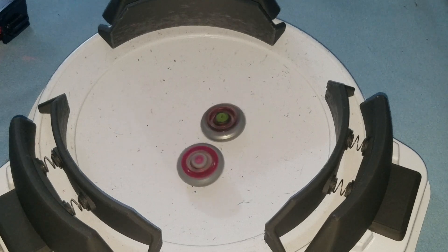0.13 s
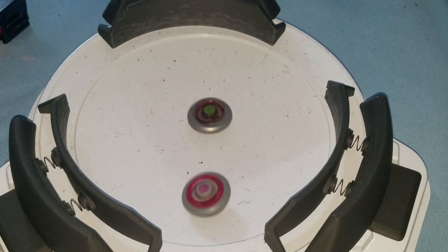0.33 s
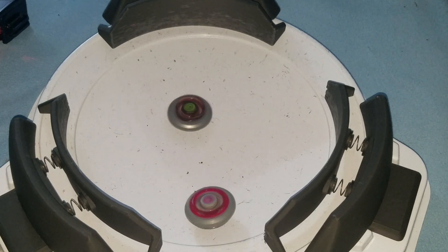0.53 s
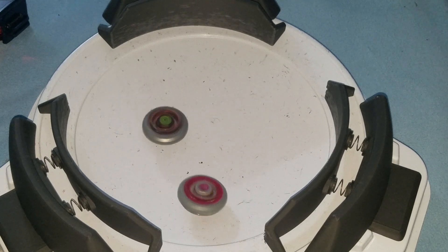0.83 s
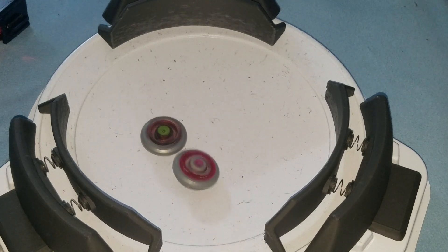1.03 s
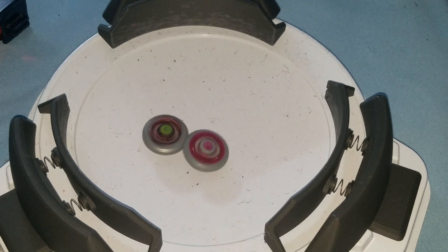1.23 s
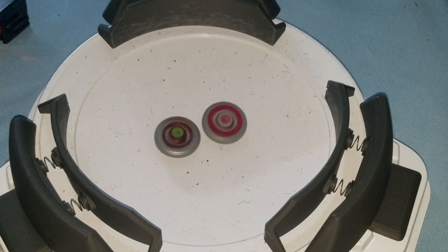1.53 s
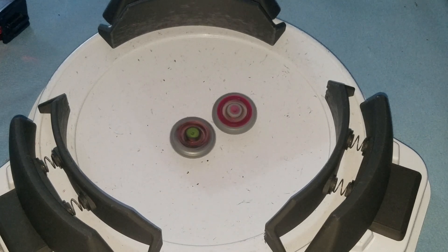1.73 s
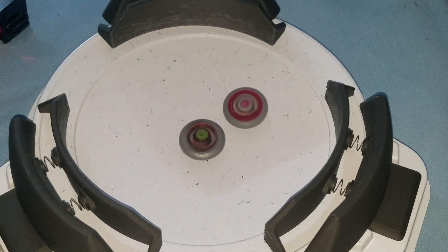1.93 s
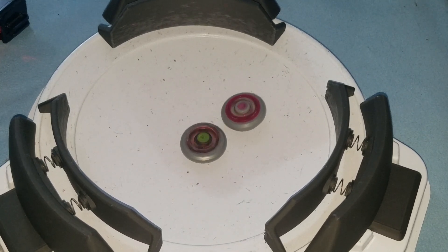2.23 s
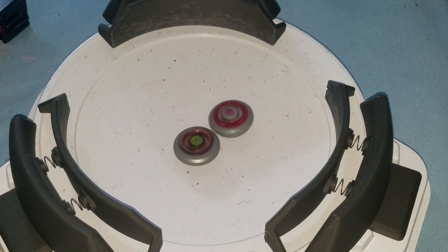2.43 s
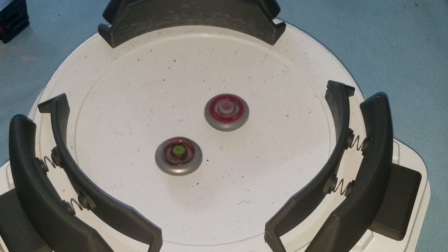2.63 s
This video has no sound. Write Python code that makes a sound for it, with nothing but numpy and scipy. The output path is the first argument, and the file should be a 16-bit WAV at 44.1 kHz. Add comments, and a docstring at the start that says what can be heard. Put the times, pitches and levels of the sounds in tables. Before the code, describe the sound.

Two spinning tops with metal wheels collide several times in a plastic dish, each hit a sharp, briefly ringing clink. Between hits their tips whir softly and tick. Heard close in a small room with a faint hum.

```python
"""A plastic dish in a small room: two spinning tops with metal wheels circle and clash. Each clash rings
both wheels, whose modes the spin splits into close pairs, and sends the tops skidding. The tips whir on
the dish; one ticks about once a turn, the other clicks for a while. A top knocks the wall twice.
The room answers; a faint hum lies underneath."""
import sys
import numpy as np
from scipy import signal
from scipy.fft import rfft, irfft, next_fast_len
from scipy.io import wavfile
from scipy.ndimage import uniform_filter1d, map_coordinates

SR = 44100
rng = np.random.default_rng(int(sys.argv[2]) if len(sys.argv) > 2 else 0)


def persist_wave(psi):
    """Save psi, clipped to +-1, as 16-bit WAV."""
    counts = np.round(np.clip(psi, -1, 1) * 32767).astype(np.int16)
    wavfile.write(sys.argv[1], SR, np.atleast_2d(counts).T)


N = 123479

# room noise spectrum: f/Hz, level/dB
AIR_SPECTRUM = [(25, -56), (60, -5), (200, -18.5), (500, -9.5), (1700, -17), (3000, -22.5), (6000, -82),
                (9500, -36), (12000, -28), (15800, -17.5)]
# tip rub envelope: t/s, low/dB, mid/dB, treble/dB
WHIR_LEVELS = [(0.0, -47.5, -55.5, -110), (0.26, -54, -53.5, -54), (0.4, -49.5, -53, -52.5),
               (0.65, -50, -49, -58.5), (0.9, -54.5, -55, -55.5), (1.071, -43, -41, -57),
               (1.149, -46.5, -49, -79), (1.32, -50.5, -51.5, -67), (1.46, -48.5, -52, -61.5),
               (1.59, -51, -52.5, -69.5), (1.96, -65, -62, -67.5), (2.129, -74, -76, -72),
               (2.33, -53, -60, -63.5), (2.4, -68.5, -71, -85.5), (2.46, -50, -41, -31),
               (2.55, -56.5, -59, -57.5), (2.63, -60, -74.5, -60.5), (2.8, -76.5, -80, -76)]
# low dish resonances: f/Hz, width/Hz, level/dB
DISH_LOW_MODES = [(184, 16, 2), (256.7, 28.2, 2.5), (319, 58.5, 0), (404, 119, -6.5)]
# upper dish resonances: f/Hz, width/Hz, level/dB
DISH_HIGH_MODES = [(1122, 330, -0.5), (1447, 97, 5), (1592.5, 36.5, 9), (2469, 82, 1.5), (3385, 302, -6.5),
                   (4760, 56, -16.5), (8050, 100, -14.5), (13500, 5000, -35.5)]
# tip hiss spectrum: f/Hz, level/dB
HISS_SPECTRUM = [(3000, -5.5), (4500, 0), (8000, 5), (9500, -17.5), (12000, 2), (15800, 3.5)]
# taps of one tip: t/s, level/dB, low share/dB, bright share/dB
TICKS = [(0.0318, -36, -9, -13), (0.0687, -37.5, -6.5, -12.5), (0.1082, -38.5, -9, -13.5),
         (0.1471, -45.5, -3, -31), (0.3466, -35.5, -7, -19), (0.3706, -35, -20, -15),
         (0.3865, -38.5, -26, -25), (0.4125, -43.5, -10, -14), (0.4544, -37, -6.5, -15),
         (0.4933, -40, -8, -20), (0.5192, -41, -5, -13), (0.5916, -33.5, -3.5, -15.5),
         (0.635, -35, -20, -16), (0.6749, -38, -8, -9), (0.7163, -34.5, -19.5, -2), (0.7572, -36, -15.5, 3),
         (0.7976, -34, -6.5, -0.5), (0.8395, -37, -14, -25), (0.8799, -35.5, -7, -8), (0.9213, -34, -5, -5),
         (0.9457, -43, 3.5, -5.5), (0.9652, -37, -1, -6.5), (1.1313, -38, 2.5, -2),
         (1.297, -36.5, -4, -16.5), (1.3359, -35.5, -12, -9.5), (1.3773, -36.5, -8.5, -11),
         (1.4182, -40, -3.5, -6.5), (1.504, -42, -2, -16), (1.5469, -40, -1, -10.5),
         (1.5908, -36.5, -8.5, -13), (1.6322, -39, -11.5, -8), (1.7015, -52, 5, -8),
         (1.7439, -42.5, -8, -11.5), (1.934, -41, -3, -22), (1.9784, -37.5, -10, -14.5),
         (2.0208, -38, -10, -9), (2.0657, -37, -4.5, -20.5), (2.1096, -45.5, -11.5, -16),
         (2.153, -37.5, -11.5, -17.5), (2.1949, -41, -3, -14.5), (2.2398, -44, -3.5, -20),
         (2.3316, -37, -6, -18), (2.3745, -41, -12, -20.5), (2.6908, -52.5, -1, -12),
         (2.7287, -52, -2, -13), (2.7726, -46.5, -3.5, -17), (1.8043, -45.5, -1, -23.5)]
# wheel on wheel: t/s, low ring/dB, high ring/dB, contact modes/dB, wash/dB, crack/dB, thud/dB,
# knock/dB, skid/dB, noise tilt/(dB/octave), T60/ratio, waver/ratio, detune/cents
CLASHES = [(0.2193, -15.5, -12, -6, -20, -25, -28.5, -30.5, -36, 0.5, 0.73, 1.3, -1),
           (1.0225, -24.5, -16, 3, -27, -12.5, -25.5, -52, -40, -0.5, 0.82, 1.34, -8.5),
           (1.1784, -36, -52, -9, -39, -50, -34, -31, -62.5, -4, 0.39, 1.46, -6),
           (1.1893, -43, -33, -8.5, -29, -8.5, -23.5, -34.5, -49.5, -0.5, 1.27, 0.82, -7),
           (1.8286, -17, -17, 0.5, -26.5, -15.5, -30, -28.5, -65.5, -0.5, 0.93, .45, 1),
           (2.2982, -29, -31, 5, -37, -24.5, -41.5, -34, -58.5, -2.5, 0.78, 0.52, -2),
           (2.4198, -20, -26.5, 16.5, -23, -12, -32.5, -40.5, -31.5, -0.5, 0.94, 0.99, 0.5)]
# wheel modes, a common set and a set whose share depends on the contact point:
# f/Hz, level/dB, T60/s, left minus right/dB
WHEEL_MODES = [
    [(5531, -15, .4, -4), (5625, -13.5, .38, -4), (5981, -2, .37, -1), (6029, -2, .19, -1),
     (6075, -3, .33, -1), (6416, -20, .24, -2), (7990, -20, .19, -5), (12000, -17, .2, 2),
     (13558, -11, .26, 0), (13615, -5, .21, 0), (13758, -5, .25, 0)],
    [(4786, -28, .22, 0), (11120, -14, .18, 2), (12350, -19, .19, 1), (12775, -13, .14, 1),
     (12830, -12, .21, 1), (12877, -11, .19, 1), (13437, -3, .2, 0), (14150, -16, .14, 0),
     (15150, -14, .14, 0)],
]
# crack and wash spectrum: f/Hz, level/dB
CRACK_SPECTRUM = [(60, -68), (300, -7), (1500, -8.5), (3000, -2.5), (4400, -10), (5200, -6.5), (6500, -2),
                  (8300, 2), (9000, -21.5), (9800, -12), (10600, 0), (13000, 2), (15700, -2.5)]
# clicks of the other tip: t/s, level/dB
CLICKS = [(0.4788, -29), (0.521, -27), (0.5606, -28), (0.602, -34), (0.6328, -37), (0.6742, -48),
          (0.756, -47), (0.7979, -48), (0.8887, -37), (0.9286, -44.5), (0.967, -48.5)]
# top on dish wall: t/s, level/dB
WALL_KNOCKS = [(1.1891, -24), (1.2215, -34)]
# dish wall resonances: f/Hz, width/Hz, level/dB
WALL_MODES = [(1090, 50, 0), (2230, 92, -8)]
# microphone likeness: f/Hz, left-right correlation (clipped to +-1 in use)
MIC_LIKENESS = [(30, -13.5), (100, 4), (300, 0.98), (700, 0.67), (2500, 0.57), (7000, 0.06), (14000, -0.4)]
# microphone balance: f/Hz, left minus right/dB
MIC_BALANCE = [(40, 10), (190, 1.5), (400, 0.5), (1500, -1), (6000, -3), (12000, 1)]
# microphone phase: f/Hz, left lag/rad
MIC_LAG = [(60, 0.82), (190, 0.68), (300, 0.24), (700, 0)]


def amp(db):
    """dB to gain."""
    return 10 ** (np.asarray(db) / 20)


def decay(t, t60_s):
    """Exponential fall, 60 dB in t60_s."""
    return amp(-60 * t / t60_s)


def unit(x):
    """Scale to rms 1."""
    return x / np.sqrt(np.mean(x ** 2) + 1e-20)


def along(points, hz):
    """Interpolate (f/Hz, value) points on a log axis."""
    f, v = np.transpose(points)
    return np.interp(np.log(hz + 1), np.log(f + 1), v)


def wobble(rate_hz, size):
    """Smooth random curve, rate_hz knots a second."""
    knots = rng.standard_normal(int(size * rate_hz / SR) + 4)
    return map_coordinates(knots, [np.arange(size) * rate_hz / SR])


def filtered(x, response):
    """Apply a complex frequency response."""
    n = x.shape[-1]
    m = next_fast_len(n + SR // 8)
    return irfft(rfft(x, m) * response(np.fft.rfftfreq(m, 1 / SR)), m)[..., :n]


def noise(size, response):
    """Two independent filtered noises."""
    return filtered(rng.standard_normal((2, size)), response)


def spectrum(points):
    """Response through (f/Hz, level/dB) points."""
    return lambda hz: amp(along(points, hz))


def body(modes, scatter_db=0):
    """Response of parallel resonances, alternating in sign."""
    gains = amp(scatter_db * rng.standard_normal(len(modes)))
    return lambda f: sum(
        (-1) ** k * gains[k] * amp(db) * 1j * f * width / (hz * hz - f * f + 1j * f * width)
        for k, (hz, width, db) in enumerate(modes))


def stereo(sources):
    """Mix two independent signals to left and right with the microphones' likeness."""
    def weights(hz):
        angle = np.arccos(np.clip(along(MIC_LIKENESS, hz), -1, 1)) / 2
        return np.array([np.cos(angle), np.sin(angle)])
    mid, side = filtered(sources, weights)
    return np.array([mid + side, mid - side])


def add(track, at_s, sound):
    """Mix a sound in at at_s."""
    k = round(at_s * SR)
    track[:, k:k + sound.shape[-1]] += sound[:, :N - k]


def room(x, t60_s=.22, delay_s=.004):
    """Reverberation: a fresh noise tail per channel."""
    t = np.arange(SR // 3) / SR
    tail = rng.standard_normal((2, len(t))) * decay(t, t60_s) * (t > delay_s)
    return signal.fftconvolve(x, tail / np.linalg.norm(tail[0]), axes=1)[:, :x.shape[1]]


def background(hum_hz=98, half_width_hz=16):
    """Wavering low hum over broad room noise."""
    band = noise(N, lambda hz: 1 / (1 + ((hz - hum_hz) / half_width_hz) ** 2))
    tone = .38 * np.sin(2 * np.pi * hum_hz * np.arange(N) / SR + wobble(3.735, N))
    hum = unit(stereo(band)) / 2 + tone
    air = unit(stereo(noise(N, spectrum(AIR_SPECTRUM))))
    return amp(-54.5) * hum + amp(-59) * air


def whir(grit_per_s=500, grit_spread_db=5):
    """Tips rub the dish: gritty noise drives its resonances and hisses."""
    times_s, *levels = np.transpose(WHIR_LEVELS)
    low_db, mid_db, treble_db = [np.interp(np.arange(N) / SR, times_s, db) for db in levels]
    grit = (rng.random(N) < grit_per_s / SR) * amp(grit_spread_db * rng.standard_normal(N))
    rub = rng.standard_normal((3, 2, N)) * (1.66 + unit(uniform_filter1d(grit, size=40)))

    def band(drive, response, db, flicker_db, flicker_hz):
        return unit(stereo(filtered(drive, response))) * amp(db + flicker_db * wobble(flicker_hz, N))
    return (band(rub[0], body(DISH_LOW_MODES), low_db, 2.66, 23.45)
            + band(rub[1], body(DISH_HIGH_MODES), mid_db, 2.4, 23.92)
            + band(rub[2], spectrum(HISS_SPECTRUM), treble_db, 2, 35))


def tap(modes, scatter_db=3, roughness=1.31, pitch_spread=.025):
    """Short rough push into resonances that shift with the spot struck; mono peak 1."""
    t = np.arange(SR // 8) / SR
    push = (1 + roughness * rng.standard_normal((2, len(t)))) * decay(t, t60_s=.012)
    shifts = 1 + pitch_spread * rng.standard_normal(len(modes))
    shifted = [(hz * shift, width, db) for shift, (hz, width, db) in zip(shifts, modes)]
    sound = stereo(filtered(push, body(shifted, scatter_db)))
    return sound / np.abs(sound.mean(axis=0)).max()


def tip_ticks(bright_above_hz=2000):
    """One tip stumbles about once a turn and taps the dish."""
    out = np.zeros((2, N))
    for at_s, level_db, low_db, bright_db in TICKS:
        upper = [(hz, width, db + (bright_db + 15.5) * (hz > bright_above_hz))
                 for hz, width, db in DISH_HIGH_MODES]
        tick = tap(upper) + amp(low_db + 2.5) * tap(DISH_LOW_MODES)
        add(out, at_s, amp(level_db + 1) * tick)
    return out


def wheel_ring(t, low_db, high_db, contact_db, t60_ratio, waver, cents, high_from_hz=10000):
    """Both wheels ring; the spin makes each mode waver in level and phase."""
    out = np.zeros((2, len(t)))
    tune = 2 ** (cents / 1200)
    for set_db, modes in zip((0, contact_db), WHEEL_MODES):
        for hz, db, t60_s, pan_db in modes:
            band_db = low_db if hz < high_from_hz else high_db
            level_db = db + set_db + band_db + 1.5 * rng.standard_normal()
            waver_db = waver * 3 * wobble(50, len(t))
            waver_rad = waver * .9 * np.sqrt(hz / 6000) * wobble(60, len(t))
            offset_cycles = rng.random((2, 1)) * hz / 14000
            tone = np.sin(2 * np.pi * (hz * tune * t + offset_cycles) + waver_rad)
            pan = amp([[pan_db / 2], [-pan_db / 2]])
            out += pan * amp(level_db + waver_db) * decay(t, t60_s * t60_ratio) * tone
    return out * (1 - np.exp(-t / .0004))  # 0.4 ms attack


def crack(t, crack_db, wash_db, tilt_db_per_octave, hold_s=.012):
    """Impact noise: a sharp crack and a longer wash."""
    def colour(hz):
        return amp(along(CRACK_SPECTRUM, hz) + tilt_db_per_octave * np.log2((hz + 100) / 4000))
    burst = unit(filtered(stereo(rng.standard_normal((2, len(t)))), colour))
    wash = amp(wash_db) * decay(np.maximum(t - hold_s, 0), t60_s=.25)
    return burst * (wash + amp(crack_db) * decay(t, t60_s=.007))


def skid(t, rise_s=.041):
    """Tops slide over the dish: a low rub swells and fades."""
    rub = unit(noise(len(t), body([(185, 17.3, 0), (300, 120, -12)])))
    swell = (t / rise_s * np.exp(1 - t / rise_s)) ** 1.69
    return stereo(rub) * swell


def clashes():
    """Wheels collide: ring, crack, skid and a jolt into the dish."""
    out, t = np.zeros((2, N)), np.arange(SR // 2) / SR
    for (at_s, low_db, high_db, contact_db, wash_db, crack_db, thud_db, knock_db, skid_db,
         tilt, t60_ratio, waver, cents) in CLASHES:
        ring = wheel_ring(t, low_db, high_db, contact_db, t60_ratio, waver, cents)
        impact = crack(t, crack_db, wash_db, tilt)
        slide = amp(skid_db) * skid(t)
        add(out, at_s, ring + amp(-7) * room(ring) + impact + slide)
        add(out, at_s, amp(thud_db) * tap(DISH_LOW_MODES) + amp(knock_db) * tap(DISH_HIGH_MODES))
    return out


def tip_clicks():
    """The other tip clicks: short bright noise bursts."""
    out, t = np.zeros((2, N)), np.arange(SR // 20) / SR
    for at_s, db in CLICKS:
        snap = unit(noise(len(t), spectrum(HISS_SPECTRUM))) * decay(t, t60_s=.009)
        add(out, at_s, amp(db) * snap / 2)
    return out


def wall_knocks():
    """A top hits the dish wall, which rings hollow."""
    out = np.zeros((2, N))
    for at_s, db in WALL_KNOCKS:
        add(out, at_s, amp(db) * tap(WALL_MODES, scatter_db=0))
    return out


def scene():
    """All sources, stereo."""
    hits = clashes() + wall_knocks()
    tips = tip_ticks() + tip_clicks()
    return hits + tips + amp(-6) * room(tips) + whir() + background()


def record(dry, knee_db=-18, squeeze=.45, window_s=.006, top_hz=15900, edge_hz=60):
    """Fast gain control, microphones unequal in level and bass phase, band limit."""
    power = np.abs(uniform_filter1d(np.mean(dry ** 2, axis=0), size=round(window_s * SR)))
    gain = (1 + power / amp(2 * knee_db)) ** (-squeeze / 2)
    sides = np.array([[.5], [-.5]])

    def microphones(hz):
        balance = amp(sides * along(MIC_BALANCE, hz))
        lag = np.exp(-1j * sides * along(MIC_LAG, hz))
        passband = (hz > 20) * np.clip((top_hz - hz) / edge_hz, 0, 1)
        return balance * lag * passband
    return filtered(dry * gain, microphones)


dry = scene()
out = record(dry)
persist_wave(out)
```